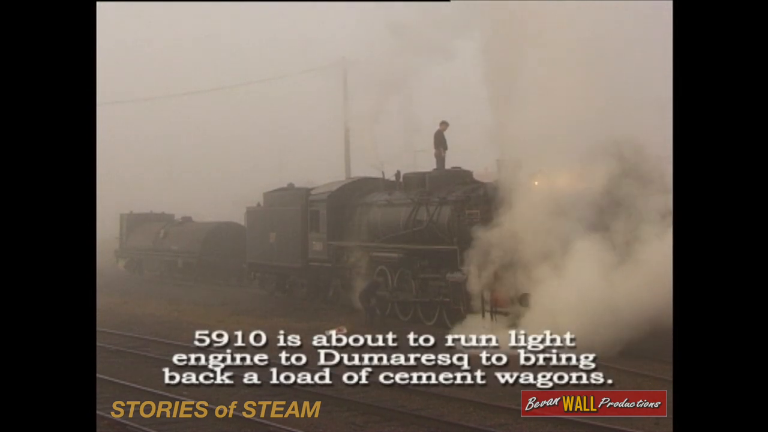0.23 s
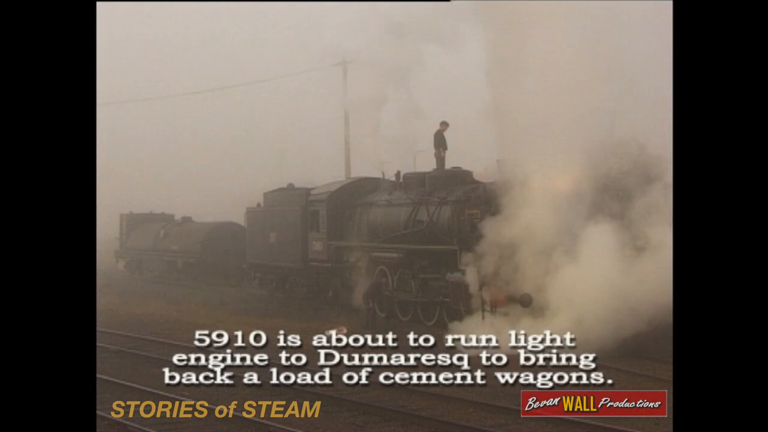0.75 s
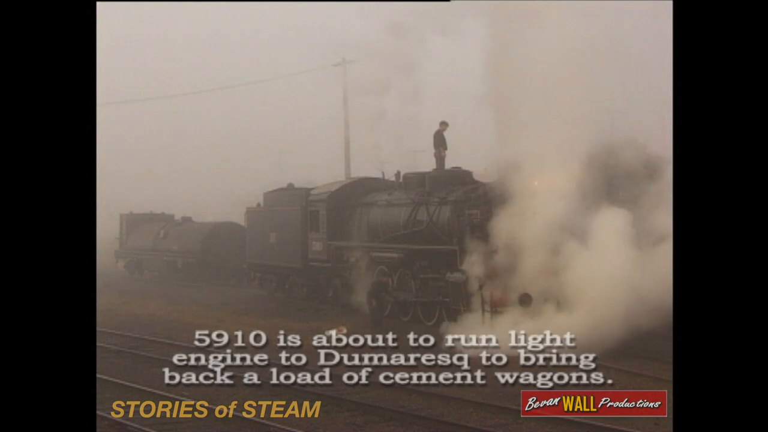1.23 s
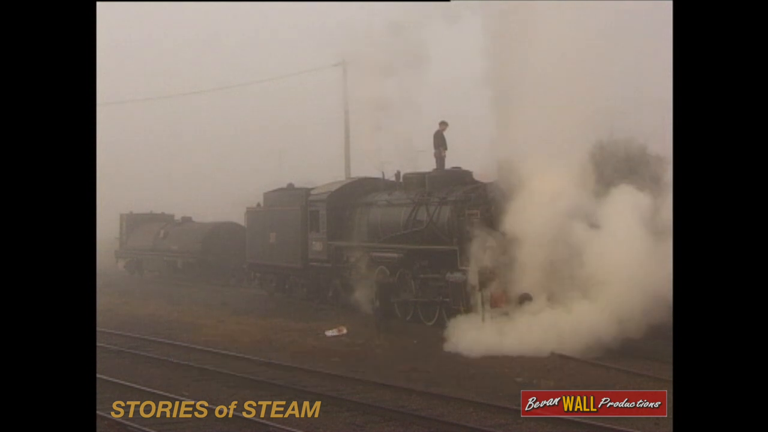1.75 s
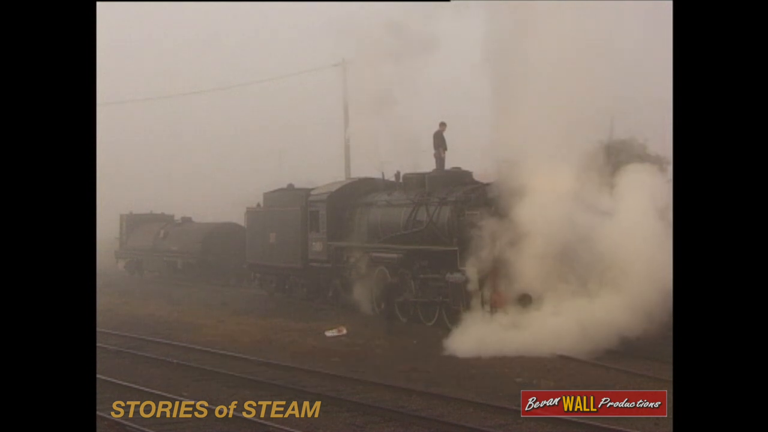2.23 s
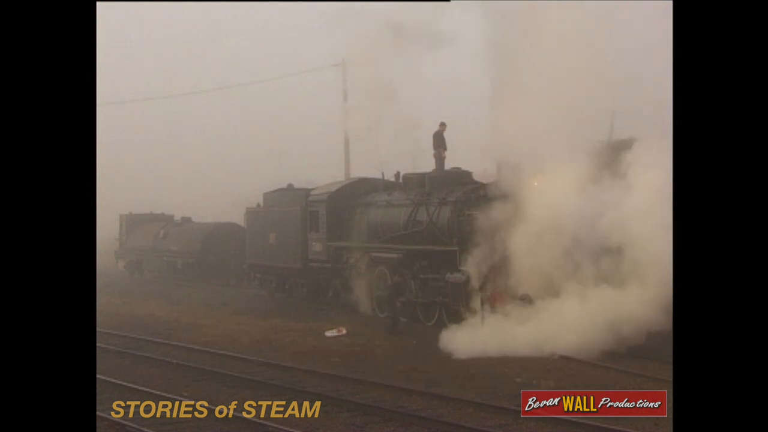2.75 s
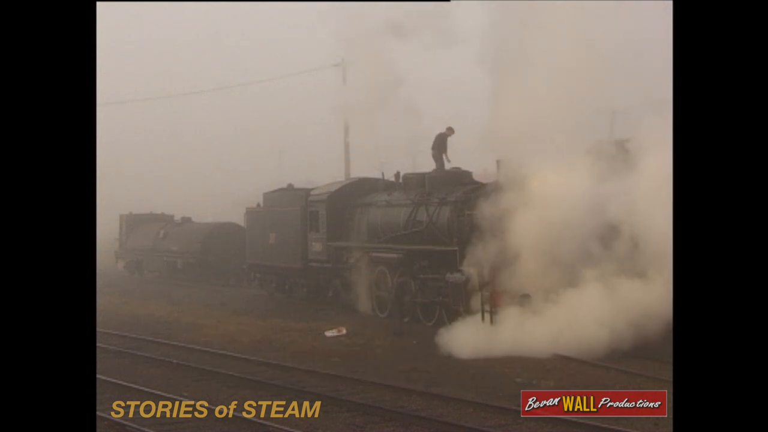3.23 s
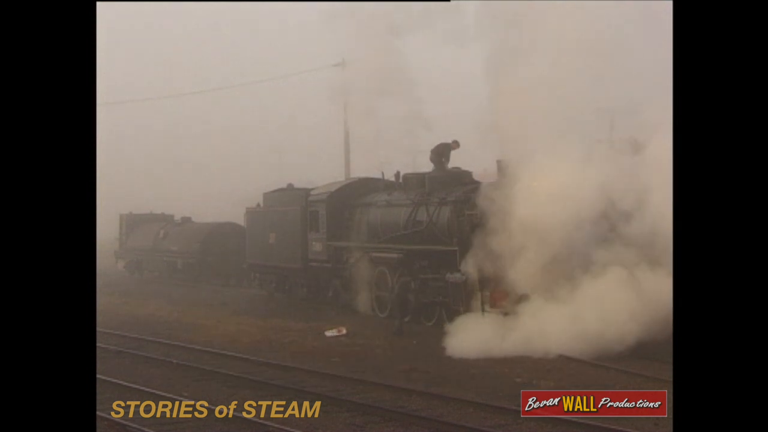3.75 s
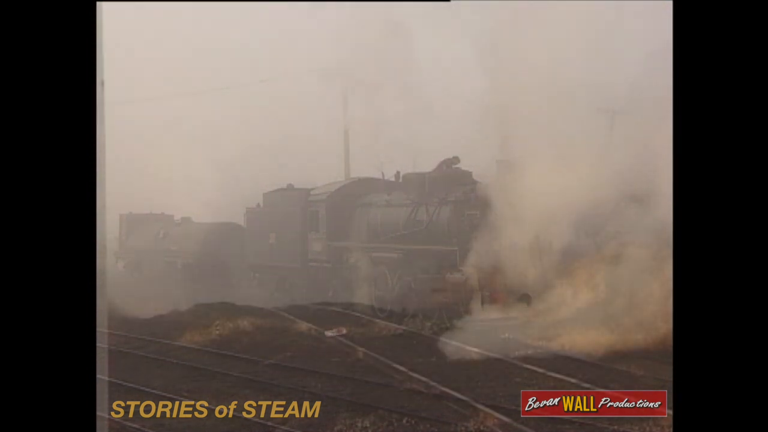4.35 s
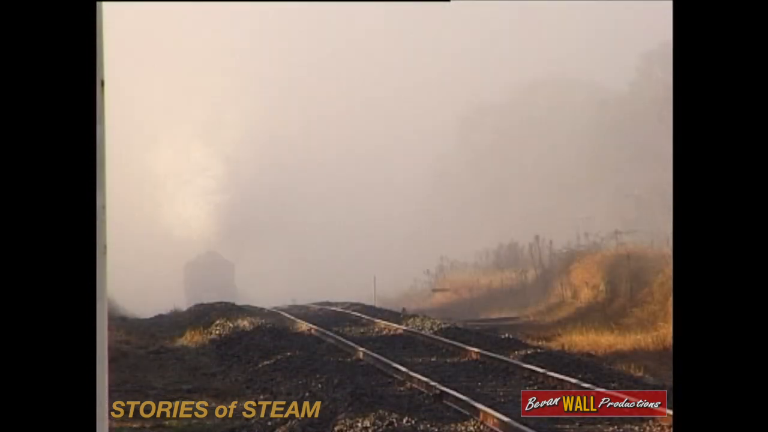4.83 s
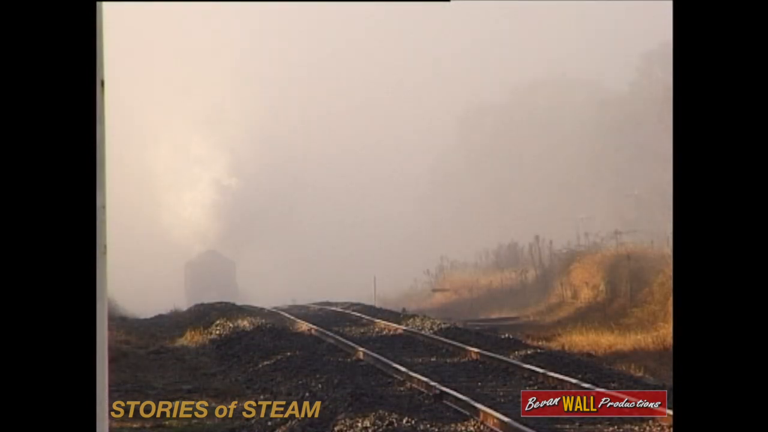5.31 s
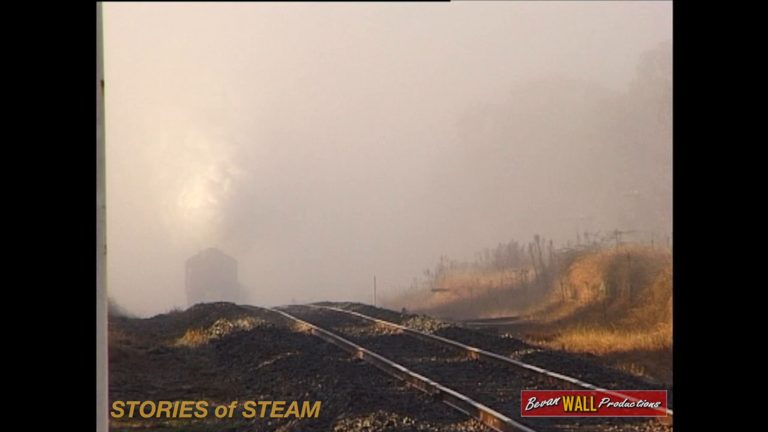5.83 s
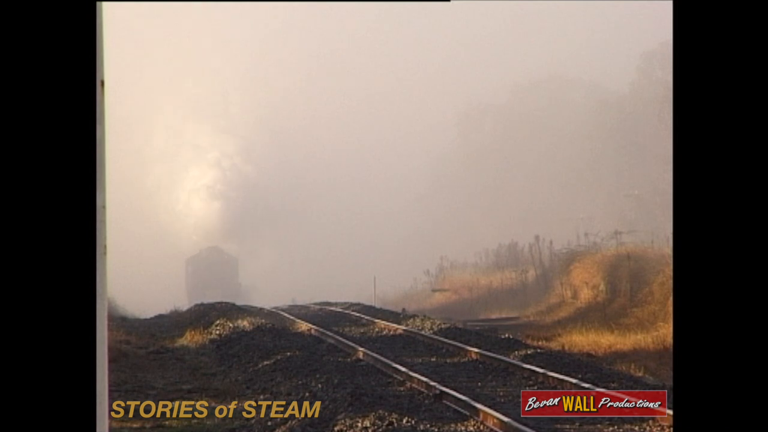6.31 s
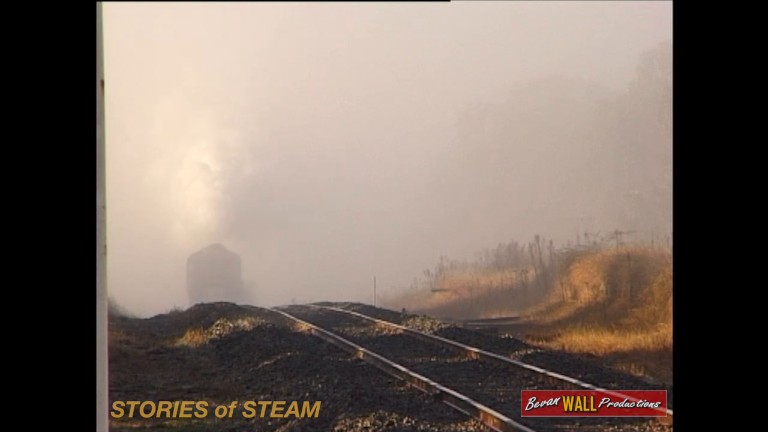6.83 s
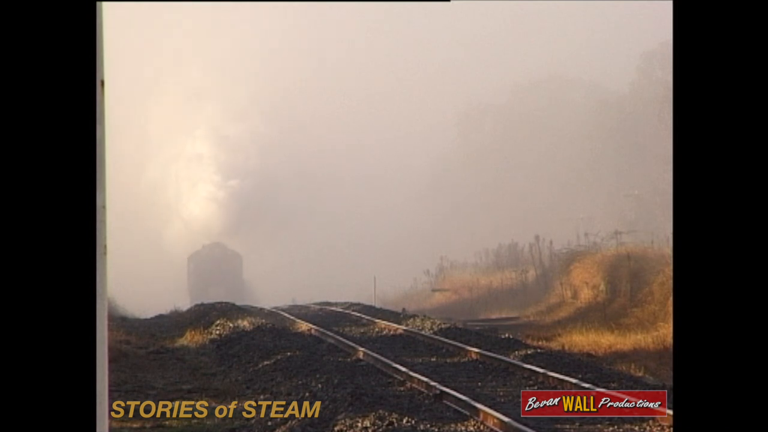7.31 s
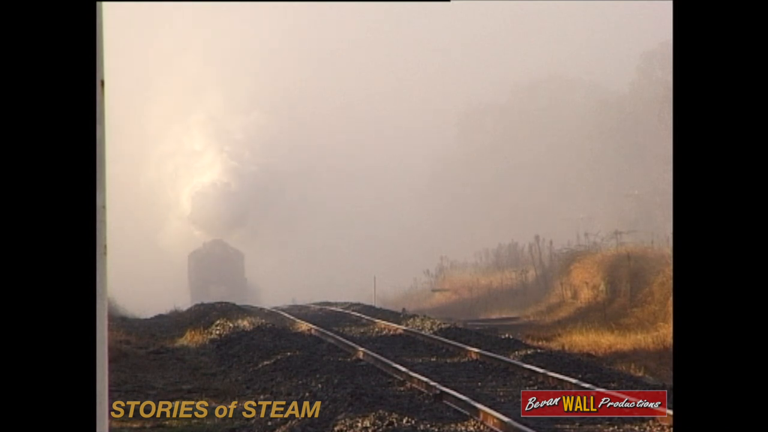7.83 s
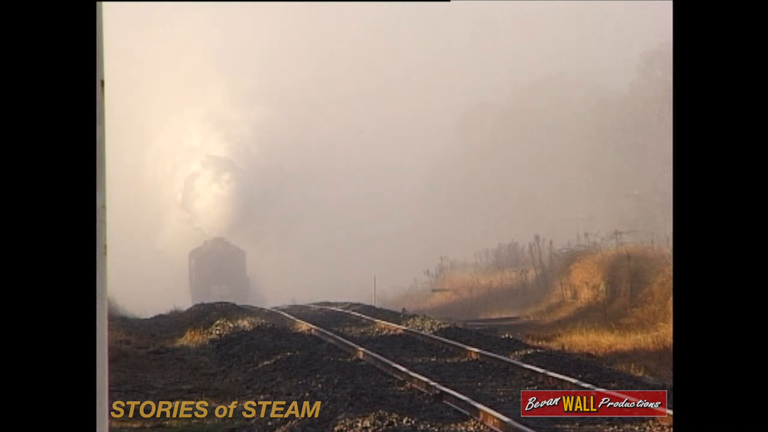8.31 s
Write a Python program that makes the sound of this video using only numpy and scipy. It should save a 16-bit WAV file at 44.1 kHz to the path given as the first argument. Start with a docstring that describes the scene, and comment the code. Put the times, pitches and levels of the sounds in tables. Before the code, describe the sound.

Loud surging steam hiss from a standing locomotive fades out, then a distant engine chuffs softly and quickly while a low hum slowly climbs.

```python
"""A surging steam hiss over a pipe roar, fire rumble and whine: a standing locomotive with open drain cocks.
It fades into a quiet foggy line side, where a distant engine approaches with quick, soft exhaust beats.
A low drone sets in there and slowly climbs in pitch.
Steam, fire, beats and air are shaped stereo noise; whine and drone are unsteady sines; rings are narrow noise."""
import sys
import numpy as np
from scipy import signal
from scipy.fft import rfft, irfft, next_fast_len
from scipy.io import wavfile
from scipy.ndimage import uniform_filter1d, map_coordinates

SR = 44100
rng = np.random.default_rng(int(sys.argv[2]) if len(sys.argv) > 2 else 0)


def inscribe(sig):
    """Save sig as 16-bit PCM at rate SR to the path in sys.argv[1].

    A 1-D sig is mono; a 2-D sig holds one channel per row.
    Samples are clipped to [-1, 1] before scaling.
    """
    pcm = np.round(np.clip(np.atleast_2d(sig).T, -1, 1) * 32767)
    wavfile.write(sys.argv[1], SR, pcm.astype(np.int16))


N = 377496
TIME_S = np.arange(N) / SR


def amp(db):
    """Decibels to gain."""
    return 10 ** (np.asarray(db) / 20)


def unit(x):
    """Scale to rms 1."""
    return x / np.sqrt(np.mean(x ** 2) + 1e-20)


def along(points, hz):
    """Read (frequency [Hz], value) points on a log frequency axis."""
    f, v = np.transpose(points)
    return np.interp(np.log(hz + 1), np.log(f + 1), v)


def curve(points):
    """Read (time [s], value) points at every sample."""
    s, v = np.transpose(points)
    return np.interp(TIME_S, s, v)


def ramp(start_s, end_s):
    """Gain rising linearly from 0 to 1 between two times."""
    return np.clip((TIME_S - start_s) / (end_s - start_s), 0, 1)


def swell(s, half_s):
    """Gaussian rise and fall around a time, top 1; half_s is its standard deviation."""
    return np.exp(-.5 * ((TIME_S - s) / half_s) ** 2)


def wobble(knots_per_s):
    """Smooth random curve through normally distributed knots."""
    knots = rng.standard_normal(int(N * knots_per_s / SR) + 4)
    return map_coordinates(knots, [np.arange(N) * knots_per_s / SR])


def filtered(x, response):
    """Multiply the spectrum of x by response(hz)."""
    m = next_fast_len(N + 8192)
    spectrum = rfft(x, m) * response(np.fft.rfftfreq(m, 1 / SR))
    return irfft(spectrum, m)[..., :N]


def above(hz, edge_hz, order=12):
    """Smooth step in frequency: 0 below the edge, half at it, 1 above."""
    return 1 - 1 / (1 + (hz / edge_hz) ** order)


def rush(colour, alike, patchy_db):
    """Stereo noise of gain colour(hz) in patches of random strength; its middle has rms 1."""
    z = signal.stft(rng.standard_normal((2, N)), nperseg=512)[2]
    field = uniform_filter1d(rng.standard_normal(z.shape[1:]), size=7, axis=0)  # over frequency
    field = uniform_filter1d(field, size=14, axis=1)  # over time
    pair = signal.istft(z * amp(patchy_db * unit(field)), nperseg=512)[1][:, :N]

    def mid_side_gains(hz):
        turn = np.arccos(np.clip(along(alike, hz), 0, 1)) / 2
        return colour(hz) * np.array([np.cos(turn), np.sin(turn)])

    mid, side = filtered(pair, mid_side_gains)
    return np.array([mid + side, mid - side]) / np.std(mid)


def tone(hz, waver_hz, flutter_db):
    """Sine of rms 1, slightly unsteady in pitch and level."""
    phase = 2 * np.pi * (np.cumsum(hz + waver_hz * wobble(14)) / SR + rng.random())
    return unit(np.sin(phase) * amp(flutter_db * wobble(5)))


def fuzzy(hz, width_hz):
    """Narrow noise band of rms 1: a carrier with randomly wandering amplitude and phase."""
    phase = 2 * np.pi * np.cumsum(np.broadcast_to(hz, N)) / SR
    return unit(wobble(width_hz) * np.sin(phase) + wobble(width_hz) * np.cos(phase))


def placed(x, balance, lead):
    """Give each frequency its own level and phase difference between left and right."""
    half = np.array([[.5], [-.5]])
    return filtered(x, lambda hz: amp(half * along(balance, hz)) * np.exp(1j * half * along(lead, hz)))


FIRST_TURN_S, TURN_S = 4.802, .3106  # far engine's driving wheels: first turn, length of a turn
MUFFLED_DB, CLEAR_DB, NEARING_S = -7.5, 1.7, 2.4  # treble gain: from, to, time taken


def through_fog(x):
    """The long path through the air takes away treble, less so as the engine nears."""
    treble = filtered(x, lambda hz: above(hz, edge_hz=3500, order=4))
    treble_db = MUFFLED_DB + (CLEAR_DB - MUFFLED_DB) * ramp(FIRST_TURN_S, FIRST_TURN_S + NEARING_S)
    return x + (amp(treble_db) - 1) * treble


# far left-right likeness: (frequency [Hz], correlation [0-1])
FAR_LIKENESS = [(100, 0.94), (250, 0.84), (550, 0.57), (1400, .38), (5200, 0.42), (6500, .1), (14000, .02)]
# far hiss colour: (frequency [Hz], relative level per Hz [dB])
AIR_COLOUR = [(1000, -2.5), (3800, 13), (4600, 15.5), (5100, 17), (5500, 11.5), (6000, 4.5), (8000, -3.5),
              (13000, -10), (14500, -16.5)]
# even floor colour: (frequency [Hz], relative level per Hz [dB])
FLOOR_COLOUR = [(3000, -22), (5500, 2), (9000, 0.5), (13000, -2.5), (14500, -11)]
# thin high tones: (frequency [Hz], level of the sine part before the fade-in [dB])
THIN_TONES = [(3671, -77), (4048, -74), (4500, -84), (4802, -82), (6600, -90)]
AIR_DB, FLOOR_DB, TICK_DB = -66, -75, -71


def line_side():
    """Faint hiss from afar over an even noise floor, with thin tones in it and one tiny noise tick."""
    air = amp(AIR_DB) * through_fog(rush(lambda hz: amp(along(AIR_COLOUR, hz)), FAR_LIKENESS, patchy_db=1.1))
    floor = amp(FLOOR_DB) * rush(lambda hz: amp(along(FLOOR_COLOUR, hz)), FAR_LIKENESS, patchy_db=0.0)
    thin = sum(amp(db) * (tone(hz, waver_hz=5, flutter_db=1) + fuzzy(hz, width_hz=60) / 2)
               for hz, db in THIN_TONES)
    tick = amp(TICK_DB) * fuzzy(7300, width_hz=2200) * swell(6.45, half_s=.006)
    return air + floor + thin + tick


# faint rings: (time [s], half length [s], frequency [Hz], level [dB])
RING_SWELLS = [(7.28, 0.16, 1077, -56), (7.6, 0.49, 980, -57.5), (8.25, .12, 718, -54)]


def rings():
    """Faint, wavering narrow bands of noise swell and fade in the distance."""
    return sum(amp(db) * swell(s, half_s) * fuzzy(hz, width_hz=40) for s, half_s, hz, db in RING_SWELLS)


def comb(hz, delay_s, strength):
    """Ripple that one short echo leaves in a spectrum."""
    return np.abs(1 + strength * np.exp(-2j * np.pi * hz * delay_s))


def far_colour(spectrum):
    """A distant sound arrives together with its bounce off the ground."""
    return lambda hz: amp(along(spectrum, hz)) * comb(hz, delay_s=0.0054, strength=0.11)


# far rumble colour: (frequency [Hz], relative level per Hz [dB])
RUMBLE_COLOUR = [(15, -15), (30, -1), (50, 1), (75, 4), (110, 3), (135, -4), (165, -8.5), (220, -13.5),
                 (400, -29), (900, -100)]
# smeared exhaust echo colour: (frequency [Hz], relative level per Hz [dB])
ECHO_COLOUR = [(100, -14.5), (170, 2), (250, 2.5), (320, -1), (560, 2), (800, 0), (1000, 2.5), (1900, -3.5),
               (2300, -10.5), (2650, -8), (2950, -11.5), (3450, -15), (3900, -20.5), (7000, -41.5)]
RUMBLE_DB, ECHOES_DB = -45.5, -47.5  # before fog and fade-in


def far_engine():
    """Steady noise: the approaching engine's rumble and the smeared echoes of its exhaust."""
    rumble = amp(RUMBLE_DB) * rush(lambda hz: amp(along(RUMBLE_COLOUR, hz)), FAR_LIKENESS, patchy_db=0.2)
    echoes = amp(ECHOES_DB) * rush(far_colour(ECHO_COLOUR), FAR_LIKENESS, patchy_db=1.06)
    return rumble + echoes


# exhaust beat colour: (frequency [Hz], relative level per Hz [dB])
PUFF_COLOUR = [(200, -27), (400, -18), (650, -5.5), (1000, -2), (1300, -0.5), (1900, -7), (2350, -8.5),
               (2650, -8.5), (2950, -16), (3400, -11.5), (3900, -21), (5100, -23), (5900, -41),
               (9000, -69.5)]
# four uneven beats a turn: (time into the turn [s], mean peak level before fog and fade-in [dB])
TURN_BEATS = [(0.0, -46), (0.07, -51.8), (0.152, -52.5), (0.232, -48.5)]
BEAT_SCATTER_S, BEAT_SCATTER_DB = .002, 0.6  # standard deviation from beat to beat


def exhaust_beats(rise_s=0.0087, fall_s=0.02):
    """Four puffs of noise to a turn of the wheels, one stronger than the rest, edges blurred by distance."""
    turns = np.arange(FIRST_TURN_S, N / SR, TURN_S)
    beats = [(turn + s, db) for turn in turns for s, db in TURN_BEATS]
    power = np.zeros(N)
    for (s, db), (late, strong) in zip(beats, rng.standard_normal((len(beats), 2))):
        near = slice(int((s - .1) * SR), int((s + .2) * SR))
        age_s = TIME_S[near] - s - BEAT_SCATTER_S * late
        puff = np.exp(-.5 * (age_s / np.where(age_s < 0, rise_s, fall_s)) ** 2)
        power[near] += amp(db + BEAT_SCATTER_DB * strong) ** 2 * puff
    return np.sqrt(power) * rush(far_colour(PUFF_COLOUR), FAR_LIKENESS, patchy_db=1.2)


# drone catches, holds and climbs: (time [s], fundamental [Hz])
DRONE_GLIDE = [(5.46, 115.4), (5.53, 115.5), (5.59, 124.9), (5.92, 125), (7.45, 137.3), (8.56, 143.4)]
# weak, blurred upper orders: (multiple of the fundamental, level at the start re OCTAVE_DB [dB])
UPPER_ORDERS = [(3, -13.5), (3.36, -11.5), (4.35, -12), (5.36, -14)]
DRONE_START_S, DRONE_CREST_S = 5.46, 6.4
DRONE_DB, DRONE_FADE_DB_PER_S = -45, 2.5  # fundamental at the crest, fade either side of it
OCTAVE_DB, BOOM_HZ, BOOM_HALF_WIDTH_HZ = -47.5, 245.6, 19.2  # octave and its resonance
OVERTONE_FADE_DB_PER_S = 2.6
OVERTONE_BLUR = 0.49  # share of power that is noise, not tone


def drone():
    """A motor-like hum that speeds up and mellows as its octave climbs out of a resonance."""
    hz = curve(DRONE_GLIDE)
    phase = 2 * np.pi * np.cumsum(hz + 0.27 * wobble(20)) / SR
    first_db = DRONE_DB - DRONE_FADE_DB_PER_S * np.abs(TIME_S - DRONE_CREST_S) + 0.63 * wobble(11)
    first = amp(first_db) * unit(np.sin(phase))
    boom = 1 - above(np.abs(2 * hz - BOOM_HZ), edge_hz=BOOM_HALF_WIDTH_HZ, order=3)
    octave = amp(OCTAVE_DB) * boom * unit(np.sin(2 * phase))

    def partial(k):
        pure = np.sqrt(1 - OVERTONE_BLUR) * unit(np.sin(k * phase))
        return pure + np.sqrt(OVERTONE_BLUR) * fuzzy(k * hz, width_hz=32)

    upper_db = OCTAVE_DB - OVERTONE_FADE_DB_PER_S * (TIME_S - DRONE_START_S)
    upper = sum(amp(upper_db + db) * partial(k) for k, db in UPPER_ORDERS)
    return (first + octave + upper) * ramp(DRONE_START_S, DRONE_START_S + .06)


# near left-right likeness: (frequency [Hz], correlation [0-1])
NEAR_LIKENESS = [(40, .93), (100, 0.91), (160, 0.74), (650, 0.85), (1500, 0.74), (5500, 0.78), (14000, 0.7)]
# fire colour: (frequency [Hz], relative level per Hz [dB])
FIRE_COLOUR = [(20, -26.5), (34, -17.5), (53, -19), (66, -2.5), (77, -4.5), (89, -1.5), (110, -4),
               (150, -12.5), (170, -7), (195, -28), (400, -38), (900, -100)]
# steady boiler and turbo-generator tones: (frequency [Hz], level before the fade [dB])
WHINE_TONES = [(68.6, -51), (86.1, -48.5), (259.7, -55.5), (481.8, -62), (613.7, -46), (620.4, -50.5),
               (631.2, -46.5), (689.1, -57), (751.0, -51), (1240.9, -49), (1368.7, -53), (2757.6, -46.5)]
FIRE_DB, FIRE_SAG_DB_PER_S = -38.5, 0.6  # the draught slowly eases


def boiler():
    """The fire flutters in the firebox as low noise while the turbo-generator whines in sines."""
    fire = rush(lambda hz: amp(along(FIRE_COLOUR, hz)), NEAR_LIKENESS, patchy_db=.5)
    whine = sum(amp(db) * tone(hz, waver_hz=1.02, flutter_db=2.0) for hz, db in WHINE_TONES)
    return amp(FIRE_DB - FIRE_SAG_DB_PER_S * TIME_S) * fire + whine


# escaping steam: (frequency [Hz], relative level per Hz [dB])
JET_COLOUR = [(60, -27.5), (200, -14.5), (400, -8), (1000, -10), (1500, -10), (2400, -5), (3500, -2),
              (5500, 0.5), (8500, -5), (11000, -14), (13500, -22), (14600, -36)]
# resonances of cocks and pipes: (centre [Hz], standard deviation [Hz], lift [dB])
PIPE_HUMPS = [(230, 27, 5.5), (493, 7.1, 4.5), (770, 64, 5), (887, 53, 5.5), (998, 31, 6.5), (1238, 140, 8),
              (1890, 180, 5), (2976, 279, 5.5), (4560, 160, 2.5), (5040, 140, 4), (5590, 63.6, 0.5),
              (6130, 92, 2), (6750, 62, 1), (8800, 106, 1.5), (9900, 105, 3)]
# glances off the ground and the engine's flanks: (delay [s], ripple of the log gain [Np])
NEAR_BOUNCES = [(.00178, .07), (.0059, .06), (.008, .13), (0.0147, .08), (0.0243, .07)]


def jet_colour(hz):
    """Broad jet noise, lifted at the pipe resonances and rippled by near bounces."""
    humps_db = sum(db * np.exp(-.5 * ((hz - centre) / width) ** 2) for centre, width, db in PIPE_HUMPS)
    ripple = sum(strength * np.cos(2 * np.pi * hz * delay_s) for delay_s, strength in NEAR_BOUNCES)
    return amp(along(JET_COLOUR, hz) + humps_db) * np.exp(ripple)


# water spitting through the cocks: (time [s], half length [s], hiss rise [dB], fizz rise [dB])
JET_SURGES = [(0.36, 0.1, 2, 2.5), (0.54, 0.075, 0.8, 1), (0.79, 0.062, 0.8, 2.5), (1.41, 0.14, 3, 4),
              (1.71, .04, 0.1, 2.5), (2.07, .05, 2.3, 1.2), (2.28, 0.1, 4.5, 7.0), (2.63, 0.067, 0.5, 0.8),
              (3.05, 0.11, 1.0, 1.5), (3.42, 0.15, 3, 4), (3.75, 0.096, 1.0, 3), (4.15, 0.095, 1, 2.5)]
ROAR_DB, HISS_DB, FIZZ_DB = -31, -25.0, -29.5  # registers of the steady blow
ROAR_SAG_DB_PER_S = 0.46  # eases as the cylinders clear
OPENING_DB, OPENING_S = -3, 0.18  # hiss and fizz start weak; time constant of the build-up


def drain_cocks():
    """Big eddies roar steadily; the fine ones hiss and fizz, surging as water spits through the cocks."""
    def fine(hz):
        return above(hz, edge_hz=2400)

    def finest(hz):
        return above(hz, edge_hz=6680)

    def band(share, patchy_db):
        return rush(lambda hz: jet_colour(hz) * np.sqrt(share(hz)), NEAR_LIKENESS, patchy_db)

    roar = band(lambda hz: 1 - fine(hz), patchy_db=0.6)
    hiss = band(lambda hz: fine(hz) * (1 - finest(hz)), patchy_db=0.86)
    fizz = band(finest, patchy_db=1.5)

    shared_db = OPENING_DB * np.exp(-TIME_S / OPENING_S) + 0.28 * wobble(24)  # opening and sputter
    roar_db = ROAR_DB - ROAR_SAG_DB_PER_S * TIME_S + 0.39 * wobble(20)
    hiss_db = HISS_DB + shared_db + sum(db * swell(s, half_s) for s, half_s, db, _ in JET_SURGES)
    fizz_db = FIZZ_DB + shared_db + sum(db * swell(s, half_s) for s, half_s, _, db in JET_SURGES)
    fizz_db = fizz_db + 0.23 * wobble(14)
    return amp(roar_db) * roar + amp(hiss_db) * hiss + amp(fizz_db) * fizz


# standing engine fades out: (time [s], level [dB])
NEAR_FADE = [(0, 0.5), (2.9, -0.52), (3.5, -3.5), (3.9, -7), (4.15, -9.5), (4.5, -16.5), (4.68, -22.5),
             (4.79, -31.5), (4.86, -60)]
# line side emerges: (time [s], level [dB])
FAR_FADE = [(4.65, -22), (4.82, -15.5), (5.0, -11), (5.3, -6.5), (5.65, -3), (6.1, -0.2), (7.3, -0.7),
            (8.56, 0.8)]
# near and far balance: (frequency [Hz], left minus right [dB])
NEAR_BALANCE = [(30, -3.5), (65, 0.5), (100, 2), (270, 2.6), (500, 1), (2500, 0), (10000, -1)]
FAR_BALANCE = [(60, 0), (180, 1), (540, -1), (1600, -4.5), (4770, 2), (14200, -1)]
# near and far phase: (frequency [Hz], lead of left over right [rad])
NEAR_PHASE = [(40, .58), (100, .85), (260, .7), (420, .12), (2500, -0.21), (4200, -0.47), (8000, -0.33),
              (13000, -.35)]
FAR_PHASE = [(40, .6), (110, 0.3), (450, -0.046), (700, -0.24), (1400, -0.67), (3000, -0.48), (5200, -.1)]


def scene():
    """The standing engine gives way to the line side in a short crossfade."""
    approach = through_fog(exhaust_beats() + far_engine())
    emerging = amp(curve(FAR_FADE)) * (approach + line_side())
    far = placed(emerging + rings() + drone(), FAR_BALANCE, FAR_PHASE)
    standing = amp(curve(NEAR_FADE)) * (drain_cocks() + boiler())
    near = placed(standing, NEAR_BALANCE, NEAR_PHASE)
    return near * (1 - ramp(4.77, 4.825)) + far * ramp(4.7, 4.83)


TOP_HZ = 14300


def record(dry):
    """Keep nothing at or above the band limit."""
    return filtered(dry, lambda hz: hz < TOP_HZ)


dry = scene()
out = record(dry)
inscribe(out)
```